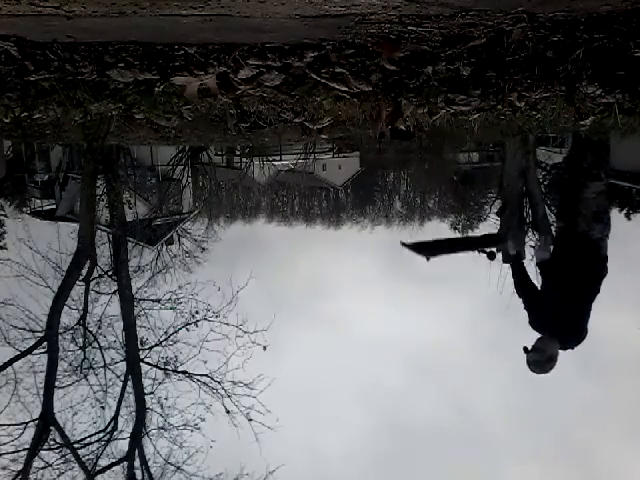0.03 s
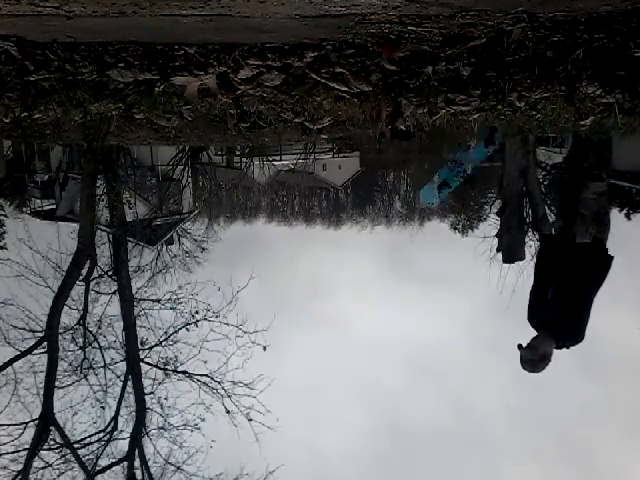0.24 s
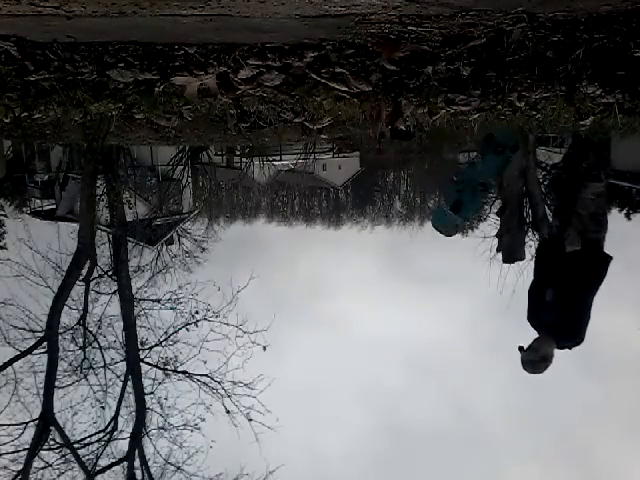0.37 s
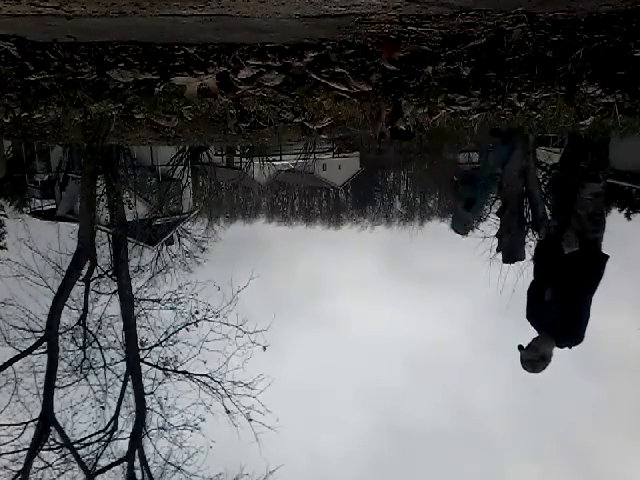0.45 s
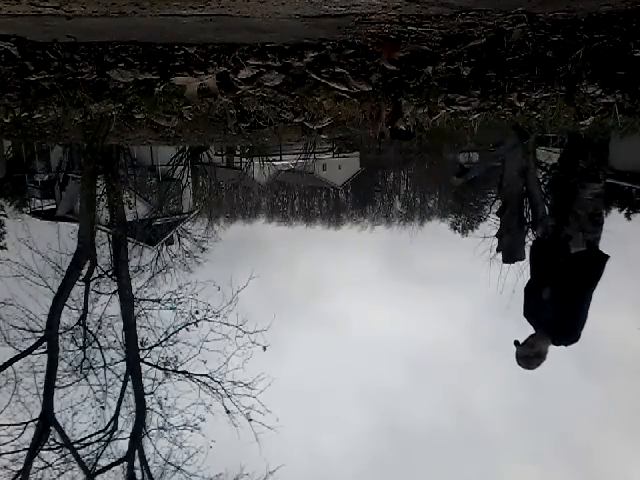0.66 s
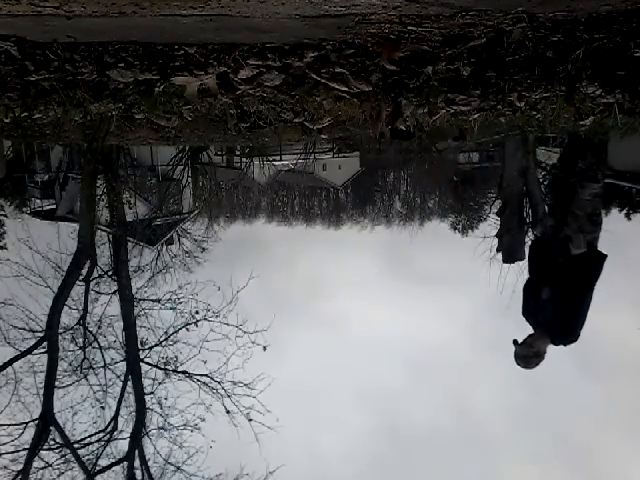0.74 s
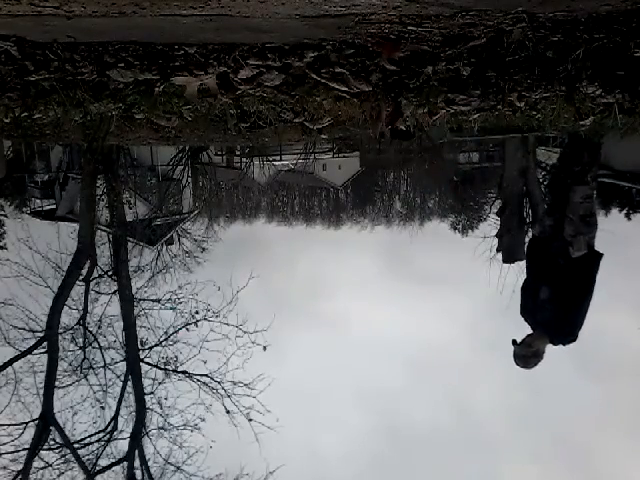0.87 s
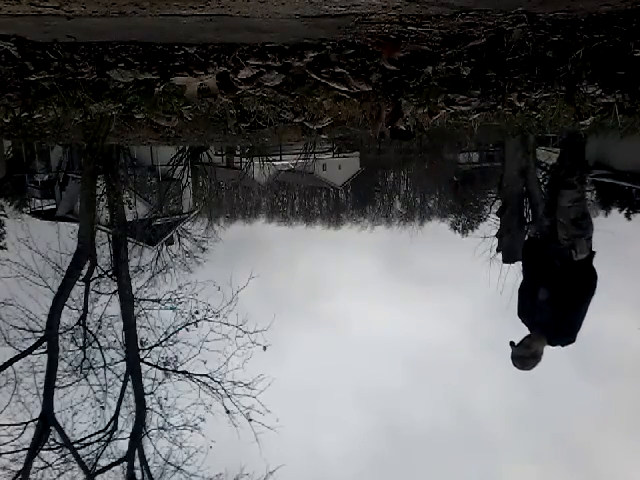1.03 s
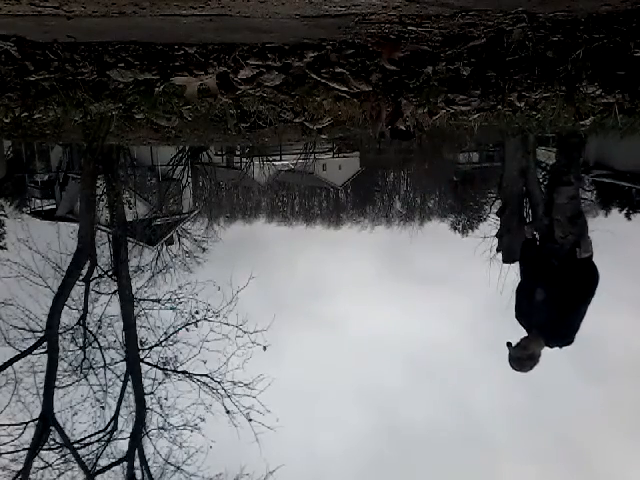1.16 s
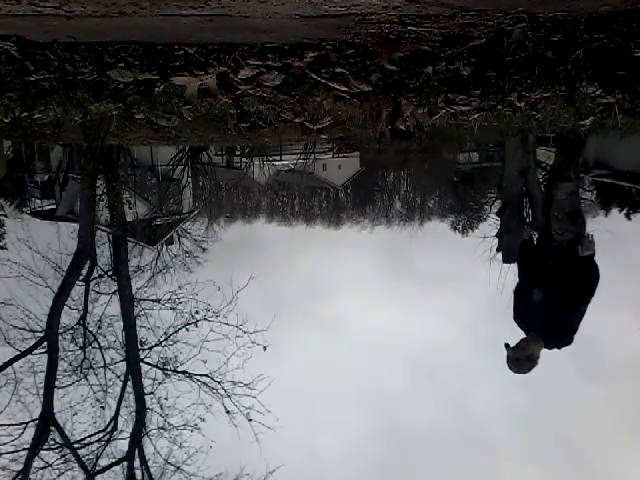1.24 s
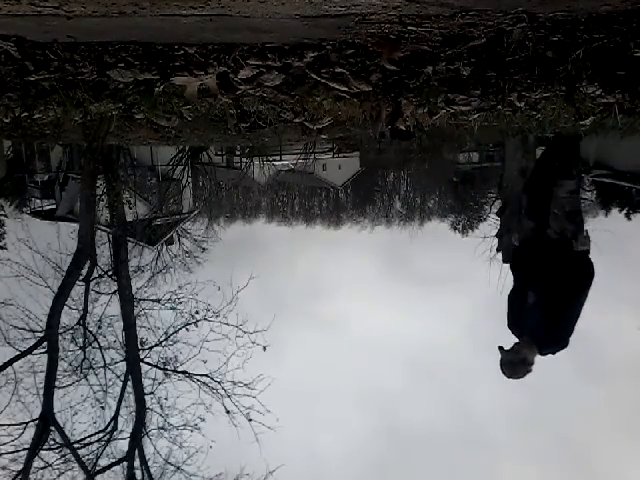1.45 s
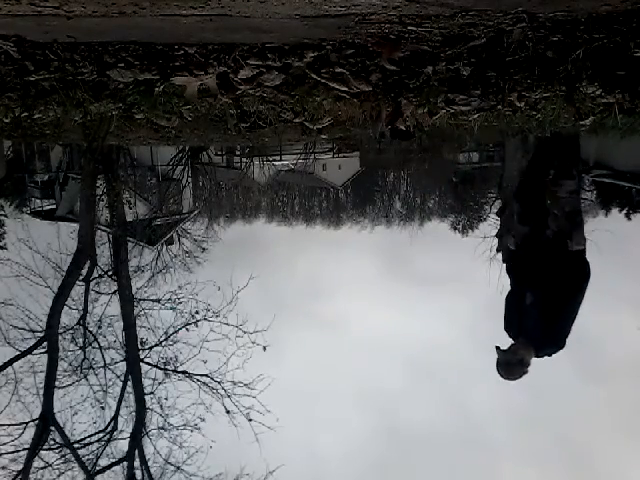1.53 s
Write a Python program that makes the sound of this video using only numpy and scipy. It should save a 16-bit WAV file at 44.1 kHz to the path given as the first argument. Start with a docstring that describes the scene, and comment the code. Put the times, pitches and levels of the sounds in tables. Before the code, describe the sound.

Loud woody crack of a flung skateboard hitting rough ground, then a second slam and fading knocks

```python
"""Skateboard flung onto the pavement

After a short swish, a wooden deck cracks down twice, bounces, lands hard once more and clatters to rest.
Each hit layers a sharp slap, a gritty noise rattle, a swelling sine knock and ringing deck and truck modes.
Houses and trees throw back a short tail made of decaying noise, after a build-up and a later echo.
Shaped noise makes the swish, the low rumble of air and the soft hiss underneath.
"""
import sys
import numpy as np
from scipy import signal
from scipy.fft import rfft, irfft
from scipy.io import wavfile

SR = 44100
rng = np.random.default_rng(int(sys.argv[2]) if len(sys.argv) > 2 else 0)


def wrap_up_sound(samples):
    """Save the sound to the file named by the first command line argument, as 16-bit audio."""
    columns = np.atleast_2d(samples).T
    # keep every value between -1 and 1, then stretch to whole-number steps
    tamed = np.clip(columns, -1, 1)
    steps = np.round(tamed * 32767).astype(np.int16)
    wavfile.write(sys.argv[1], SR, steps)


N = 70560
TIME = np.arange(N) / SR  # seconds


def from_db(db):
    """Turn decibels into gain."""
    return 10 ** (np.asarray(db) / 20)


def at_hz(points, hz):
    """Read a curve on a log-frequency axis."""
    point_hz, value = np.transpose(points)
    return np.interp(np.log(np.maximum(hz, 1)), np.log(point_hz), value)


def level(points):
    """Draw a gain envelope through points of time (s) and level (dB)."""
    return from_db(np.interp(TIME, *np.transpose(points)))


def pulse(spectrum, size=4096):
    """Make the minimum-phase pulse of a spectrum: its energy arrives as early as possible."""
    gain = from_db(at_hz(spectrum, np.fft.rfftfreq(size, 1 / SR)))
    cepstrum = irfft(np.log(gain))
    # Folding the cepstrum onto positive time makes the pulse causal.
    cepstrum[1:size // 2] *= 2
    cepstrum[size // 2 + 1:] = 0
    return irfft(np.exp(rfft(cepstrum)))


def through(x, response):
    """Pass a sound through an impulse response."""
    return signal.fftconvolve(x, response)[:len(x)]


def dying(t60, size):
    """Decay exponentially, falling 60 dB in t60 seconds."""
    return np.exp(-np.log(1000) * TIME[:size] / t60)


def dying_noise(t60s, size, stretch=1, count=9):
    """Burst of flat-spectrum noise, of about unit energy, whose bands each die at their own rate."""
    centres = np.geomspace(60, 15000, count)
    white = rfft(rng.standard_normal(size))
    hz = np.fft.rfftfreq(size, 1 / SR)
    burst = np.zeros(size)
    for centre, share in zip(centres, np.eye(count)):
        # Each band is a triangle that crossfades into its neighbours.
        band = irfft(white * at_hz(np.c_[centres, share], hz), size)
        envelope = dying(stretch * at_hz(t60s, centre), size)
        burst += band * envelope / np.linalg.norm(envelope)
    return burst


def noise(spectrum):
    """Steady coloured noise of rms 1."""
    white = rfft(rng.standard_normal(N))
    coloured = irfft(white * from_db(at_hz(spectrum, np.fft.rfftfreq(N, 1 / SR))), N)
    return coloured / coloured.std()


# Blows of the board on the ground:
# start_s, level_db, bass_db, low_mids_db, upper_mids_db, treble_db, top_db,
# rattle_t60_s (before the per-register stretch), rattle_db, spot_hz (pitch the struck spot favours),
# spot_db (boost of modes at that pitch), send_db (extra level to the street),
# knock_hz, knock_db, knock_peak_s (time to the knock's peak)
BOARD_HITS = [ (0.2361, -5, -19.5, 11, -2, 3, 5.5, 0.068, 5, 296, 9.5, 3.5, 962, 0.5, 0.0014),
              (0.2448, -11, -29, 4, 10.5, 1, 14, 0.072, 5.5, 1080, -5, 2, 620, -1.5, 0.0014),
              (0.2590, -13, -0.5, 2, 10, 5, 11.5, 0.11, 7, 657, 19.5, 7.5, 1027, -3, 0.0041),
              (0.2686, -13, 10.5, -4.5, 13, 14, -7, 0.076, -0.5, 2450, 17, 5.5, 1100, 0, 0.00073),
              (0.3173, -3, -10, -3, 7, 11, 11, 0.031, -0.5, 587, 5.5, 6, 752, 5.5, 0.00073),
              (0.3371, -14, 8, 2.5, 13.5, 10, 13, 0.14, 4, 2450, 10.5, -1.5, 700, 1, 0.0017),
              (0.6053, -27, 14, 4.5, 6, 3, 8.5, 0.07, 6, 405, 27, -2, 573, 1.5, 0.00065),
              (0.6109, -25, 13.5, 8, 3, 2, 7, 0.13, 5, 590, 7, -26.5, 720, -10, 0.001),
              (0.6332, -31, 7.5, -2, 2, 4, 4, 0.06, 4.5, 400, 15, -11, 986, -26, 0.0029),
              (0.8529, -31.5, 16, 3.5, -9, 4, 2, 0.078, 14.5, 1150, 5, 2, 1191, -5.5, 0.0031),
              (0.911, -6, 8, 3.5, -12.5, -1, -2.5, 0.048, 5, 470, 14, -2, 914, -1.5, 0.0012),
              (0.916, -17.5, 13.5, -12, 6, 7.5, 8, 0.086, 6.5, 930, -14.5, -7.5, 260, -3.5, 0.00083),
              (1.1204, -35, 13.5, 5, 3, -5, 2, 0.085, 3, 580, 16.5, -7.5, 575, -14, .003),
              (1.1560, -24, 1.5, 5.5, 3.5, 9.5, 11.5, 0.052, 4, 715, 13.5, 4, 709, 3.5, .005),
              (1.1628, -23.5, 1, 2, 10, 9, 11, 0.13, 2, 686, 10, 2.5, 1202, -7.5, 0.0043),
              (1.2667, -30, 13.5, 11, 6, 6, 8, 0.09, 7.5, 740, 7, 3.5, 724, 2, 0.0046),
              (1.3177, -32, 11.5, -4, 0.5, -2, -4, 0.093, 5, 730, 16, -13, 1160, -7.5, 0.0018),
              (1.4470, -50, -0.5, 14, 1, -20, -16, .04, 2.5, 732, 11.5, 10, 800, -7, 0.0012),
              (1.4764, -49, 0.5, -0.5, -9, -2.5, 8.5, 0.016, 9.5, 840, -13, -12, 840, 1, 0.00074), ]
# Centres of the tone bands, bass, low mids, mids, upper mids, treble, top: centre_hz
TONE_CENTRES = [130, 330, 850, 2400, 4400, 7500]


def board(size=16384):
    """Sum slap, rattle, knock and ring; the deck's angle tints the near sound, the street gets it even."""
    body_send_db = -6
    direct, sent = np.zeros(N + size), np.zeros(N + size)
    slap = deck_slap()
    for (start_s, level_db, bass, low, upper, treble, top, rattle_t60, rattle_db,
         spot_hz, spot_db, send_db, knock_hz, knock_db, knock_peak_s) in BOARD_HITS:
        crash = through(striking_force(rattle_t60, rattle_db, size), slap)
        tone = pulse(np.c_[TONE_CENTRES, [bass, low, 0, upper, treble, top]])
        knocking = from_db(knock_db) * knock(knock_hz, knock_peak_s, size)
        body = ringing(spot_hz, spot_db, size) - knocking
        start = int(start_s * SR)
        near = through(crash, tone) + body
        direct[start:start + size] += from_db(level_db) * near
        spread = crash + from_db(body_send_db) * body
        sent[start:start + size] += from_db(level_db + send_db) * spread
    return direct[:N], sent[:N]


# Colour of a blow on the deck, before its pulse is scaled to peak 1: pitch_hz, level_db
DECK_COLOUR = [(30, -41.5), (90, -15), (170, -8), (260, -2.5), (500, -2), (800, 2.5), (1050, -0.5),
               (1380, -8), (1800, -17.5), (2400, -17.5), (2950, -22.5), (3450, -18), (3850, -19.5),
               (4350, -19.5), (5200, -23), (6000, -30.5), (8000, -37.5), (15000, -38.5)]


def deck_slap():
    """The deck's woody response to a blow, as a short pulse of peak 1."""
    slap = pulse(DECK_COLOUR)
    return slap / np.abs(slap).max()


# Rattle length in each register: pitch_hz, length_ratio (times the hit's rattle_t60_s)
RATTLE_STRETCH = [(100, 4.2), (400, 1.1), (1000, 1.88), (3000, 1.4), (12000, 1.9)]


def striking_force(t60, rattle_db, size):
    """One sharp contact, then a dense rattle that builds fast and dies register by register."""
    contact_db, build_s = -6, 0.001  # build_s is a time constant
    build = 1 - np.exp(-TIME[:size] / build_s)
    rattle = build * grit(size) * dying_noise(RATTLE_STRETCH, size, stretch=t60)
    force = from_db(rattle_db) * rattle
    force[0] -= from_db(contact_db)
    return force


def grit(size):
    """Fast, uneven gain of rms 1: the deck chatters on the rough pavement."""
    spread_db, step_s = 3.5, 0.0015
    steps = rng.standard_normal(size)
    wander = np.interp(TIME[:size] / step_s, np.arange(size), steps)
    gain = from_db(spread_db * wander)
    return gain / np.sqrt(np.mean(gain ** 2))


def knock(hz, peak_s, size):
    """The deck flexes for a few cycles: a tone that swells to its peak and quickly dies."""
    age = TIME[:size] / peak_s
    swell = age * np.exp(1 - age)
    return swell * np.sin(2 * np.pi * hz * TIME[:size])


# Ringing modes of the deck and, higher up, the trucks:
# pitch_hz, level_db (before the spot's boost and random spread), t60_s
BOARD_MODES = [(266.2, -20, 0.17), (352.6, -24.5, .22), (408.3, -26, .17), (474, -20.5, 0.088),
               (592, -30, 0.27), (664, -25.5, 0.25), (733, -31.5, 0.11), (885, -23, 0.087), (940, -28, .2),
               (1091, -28, 0.12), (1180, -33, 0.12), (1490, -43.5, .2), (1728, -43.5, 0.21),
               (2230, -40, 0.16), (2314, -41.5, .16), (3460, -37.5, .11), (4640, -37, .1),
               (4760, -35.5, .1)]


def ringing(spot_hz, spot_db, size):
    """Decaying sine modes, weighted towards or away from the struck spot's pitch."""
    spot_octaves, spread_db = 0.21, 2.5
    ring = np.zeros(size)
    for hz, level_db, t60 in BOARD_MODES:
        favour = np.exp(-(np.log2(hz / spot_hz) / spot_octaves) ** 2)
        mode_db = level_db + spot_db * favour + spread_db * rng.standard_normal()
        gain = from_db(mode_db) * rng.choice([-1, 1])
        ring += gain * np.sin(2 * np.pi * hz * TIME[:size]) * dying(t60, size)
    return ring


# Colour of the street's answer: pitch_hz, level_db
STREET_COLOUR = [(40, -9), (90, 1), (160, -9), (270, -12), (700, -16.5), (1000, -19.5), (1300, -12),
                 (1750, -3.5), (2500, -7), (4000, -10.5), (7000, -13.5), (15000, -11.5)]
# Decay of the scatter in each register: pitch_hz, t60_s
SCATTER_DECAY = [(80, .9), (300, 0.29), (1000, 0.41), (3000, 0.51), (12000, 0.35)]


def street(x):
    """Scatter from trees and ground builds up and dies; house fronts add a later, blurred echo."""
    build_s = 0.056  # time constant
    echo_delay_s, echo_t60_s, echo_db = 0.064, 0.27, -1.5
    scatter = dying_noise(SCATTER_DECAY, N) * (1 - np.exp(-TIME / build_s))
    echo = rng.standard_normal(N) * dying(echo_t60_s, N)
    echo /= np.linalg.norm(echo)
    echo = np.r_[np.zeros(int(echo_delay_s * SR)), echo][:N]
    coloured = through(x, pulse(STREET_COLOUR))
    return through(coloured, scatter + from_db(echo_db) * echo)


# Loudness of the throw: time_s, level_db
SWISH_ENVELOPE = [(0, -60.5), (.045, -61), (.075, -40), (.088, -52.5), (.105, -69), (.2, -101), (.3, -98)]
# Colour of the rubbing, before scaling to rms 1: pitch_hz, level_db
SWISH_COLOUR = [(60, -11.5), (250, 6.5), (700, -0.5), (1200, 3.5), (2200, -11.5), (3500, 3), (5500, -1),
                (8000, -15), (15000, -10.5)]


def swish():
    """Sleeve and grip tape rub as the board is let go: a brief burst of coloured noise."""
    return level(SWISH_ENVELOPE) * noise(SWISH_COLOUR)


# Loudness of the air's rumble: time_s, level_db
AIR_ENVELOPE = [(0, -45.5), (.07, -45.5), (.15, -53.5), (.6, -56), (.8, -56), (1.1, -58.5), (1.3, -53),
                (1.45, -64), (1.6, -58)]
# Colour of the rumble, before scaling to rms 1: pitch_hz, level_db
AIR_COLOUR = [(20, -32.5), (45, -13.5), (75, 5.5), (130, 4), (200, -8.5), (400, -11), (1000, -18),
              (2000, -31.5), (5000, -74.5), (15000, -46)]
# Loudness of the hiss: time_s, level_db
HISS_ENVELOPE = [(0, -57), (.15, -63.5), (.22, -66.5), (.5, -62), (.59, -65.5), (.66, -61), (.8, -68),
                 (.88, -63), (1.1, -65.5), (1.18, -58), (1.35, -61.5), (1.45, -67.5), (1.6, -69)]
# Colour of the hiss, before scaling to rms 1: pitch_hz, level_db
HISS_COLOUR = [(100, 0), (2500, -1.5), (5000, 0.47), (8000, -1), (12000, 0), (16000, -1.3)]


def background():
    """Low outdoor rumble and a soft hiss, both shaped noise that wavers in level."""
    rumble = level(AIR_ENVELOPE) * noise(AIR_COLOUR)
    hiss = level(HISS_ENVELOPE) * noise(HISS_COLOUR)
    return rumble + hiss


def scene():
    """Mix the board (deep bass cut, as by a small microphone), the street, the throw and the air, in mono."""
    bass_cut_hz = 69.5
    bass_cut = signal.butter(2, bass_cut_hz, "high", fs=SR, output="sos")
    direct, sent = signal.sosfilt(bass_cut, board())
    return (direct + street(sent) + swish() + background())[None]


def record(dry):
    """Round the loudest peaks by soft saturation, then cut the top steeply."""
    overload, cutoff_hz = 1.4, 16000  # overload is the saturation ceiling
    rounded = overload * np.tanh(dry / overload)
    top_cut = signal.ellip(10, 0.1, 80, cutoff_hz, fs=SR, output="sos")
    return signal.sosfilt(top_cut, rounded)


dry = scene()
out = record(dry)
wrap_up_sound(out)
```